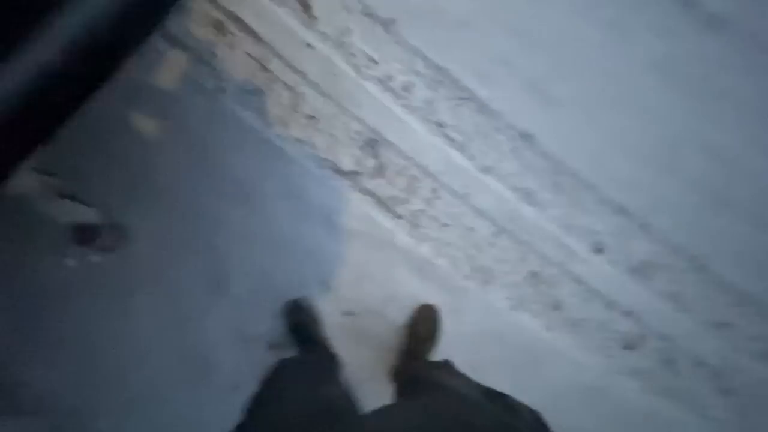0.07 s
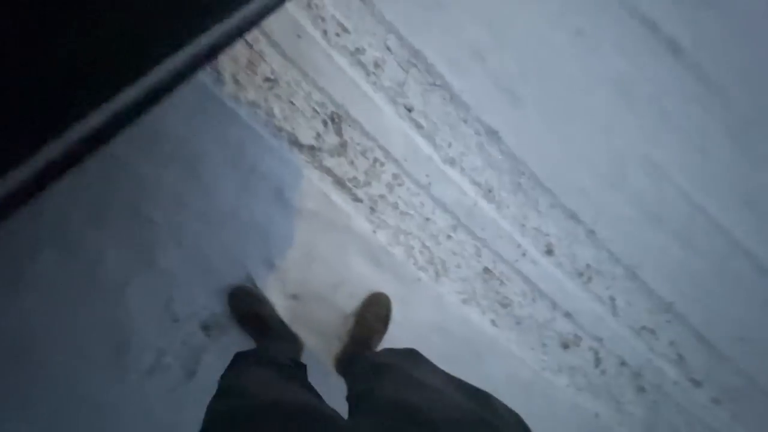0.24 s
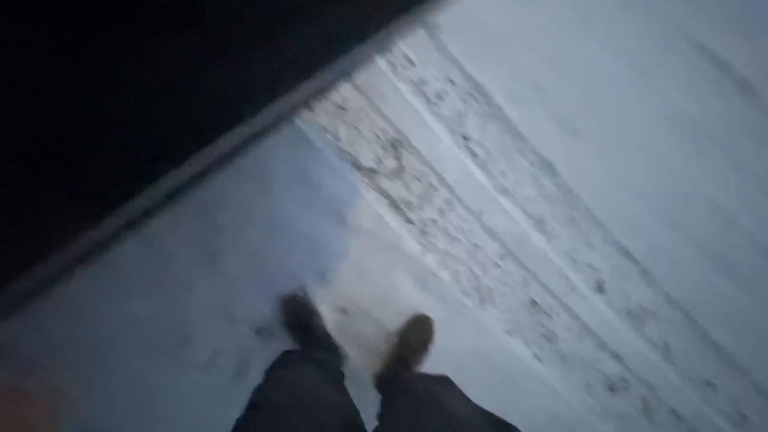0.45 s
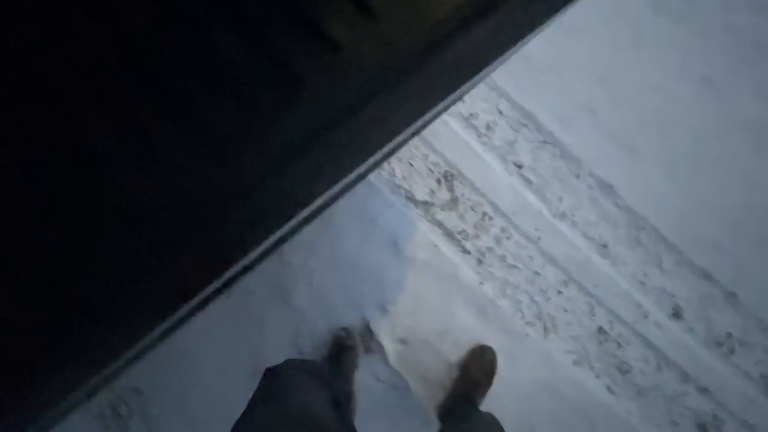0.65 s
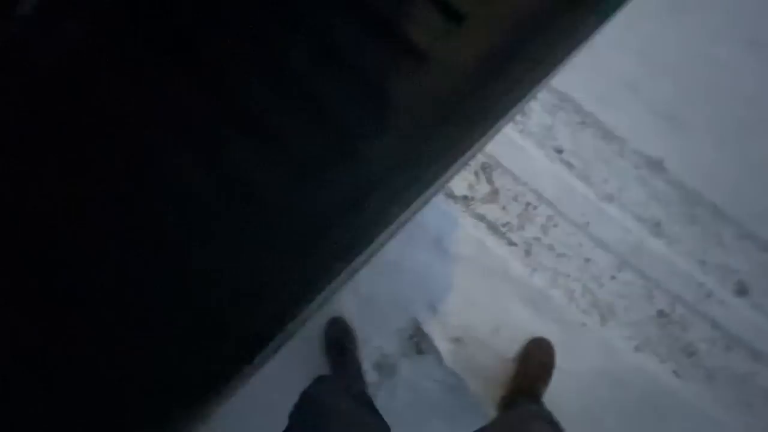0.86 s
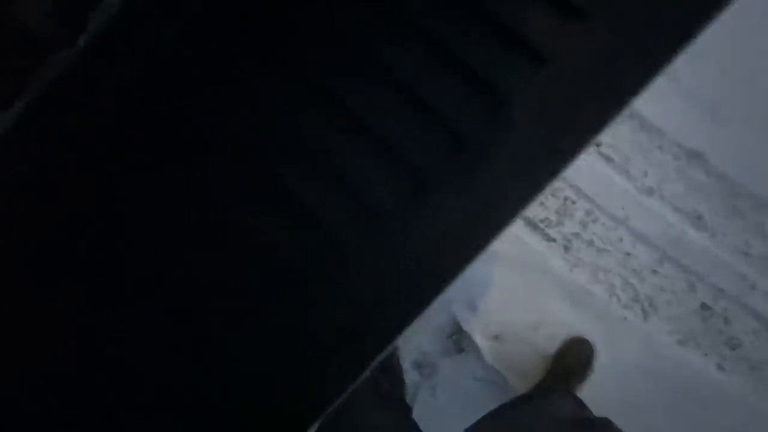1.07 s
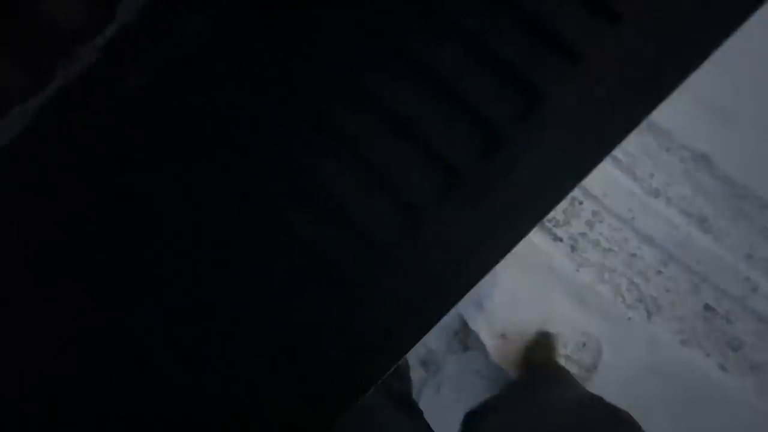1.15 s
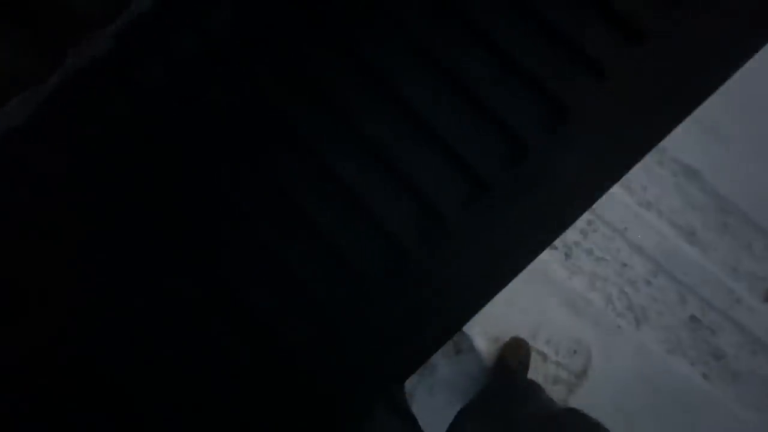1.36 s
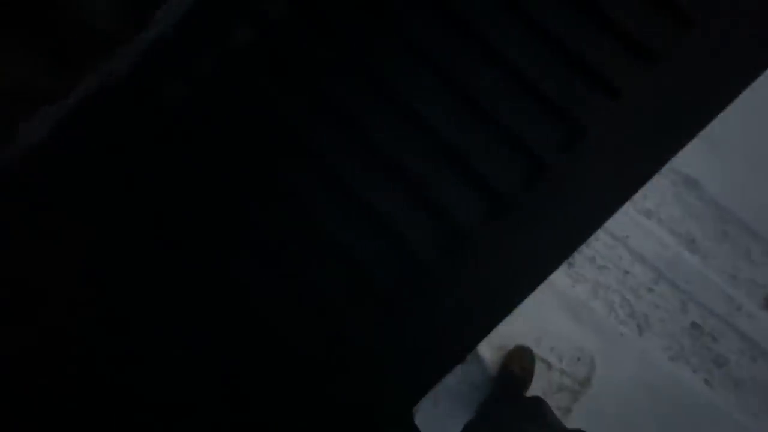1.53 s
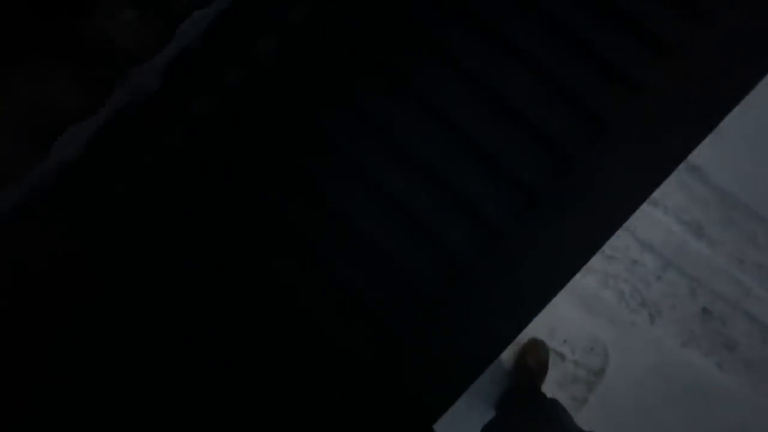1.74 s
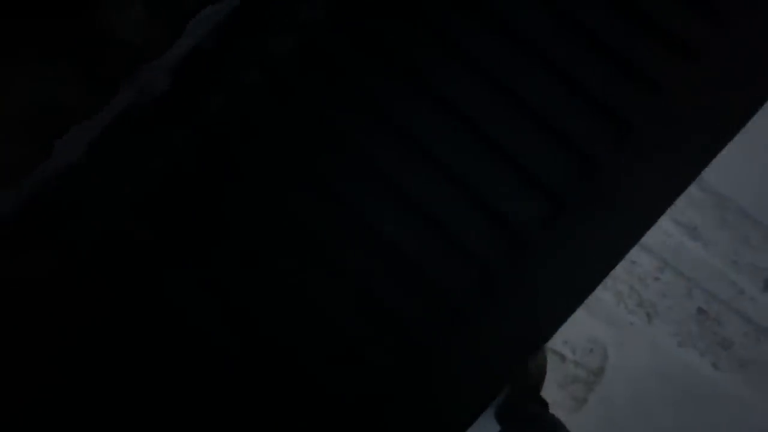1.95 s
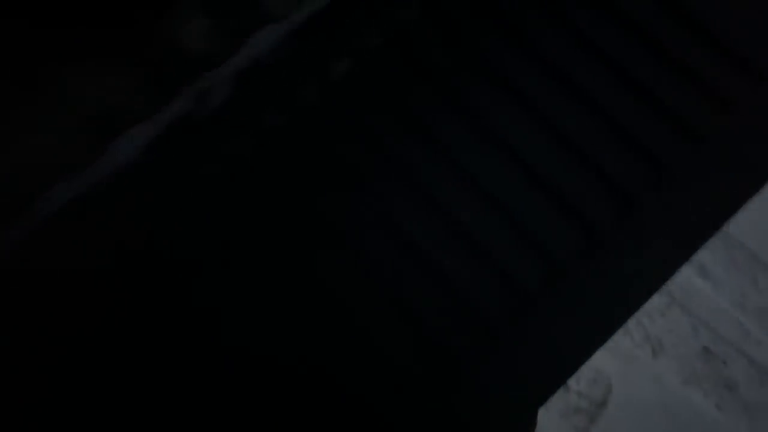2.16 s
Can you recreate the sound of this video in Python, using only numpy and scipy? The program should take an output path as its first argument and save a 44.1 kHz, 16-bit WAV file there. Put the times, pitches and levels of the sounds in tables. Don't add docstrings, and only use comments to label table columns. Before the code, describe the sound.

Close and slightly left, a metal tailgate bangs down, its panel shuddering and ringing. Quieter snow crunches follow on the right, then a near-quiet pause and several dull metal knocks, over low outdoor rumble and nylon rustle.

```python
import sys
import numpy as np
from scipy import signal
from scipy.fft import rfft, irfft, next_fast_len
from scipy.io import wavfile
from scipy.ndimage import map_coordinates

SR = 44100
rng = np.random.default_rng(int(sys.argv[2]) if len(sys.argv) > 2 else 0)


def linear_from_db(decibels):
    return 10 ** (np.asarray(decibels, float) / 20)


def unload_audio(sound):
    columns = np.transpose(np.atleast_2d(sound))
    steps = np.round(np.clip(columns, -1, 1) * 32767)
    wavfile.write(sys.argv[1], SR, steps.astype(np.int16))


N = 97020

# time_s, level_db
SHUDDER = [(0, -28.5), (.07, -34), (.2, -43), (.222, -38), (.228, -12), (.27, -13.5), (.36, -27.5),
           (.5, -33), (.55, -41), (.63, -43.5), (.68, -47.5), (1.79, -58), (1.83, -51), (2.04, -45.5),
           (2.09, -34.5), (2.2, -42)]
# centre_hz, width_hz, level_db
PANEL_MODES = [(59, 30, -11.5), (98, 34.5, -4.5), (164.4, 31.6, -4), (235, 42.3, -8), (357, 112, -11.5),
               (465, 65, -12), (620, 161, -14), (808, 400, -17), (1081, 183, -14), (1228, 232, -18.5),
               (1840, 1200, -33.5)]
# start_s, level_db, pitch_hz, t60_s
KNOCKS = [(0.227, -12, 59, 0.65), (.229, -20, 140.8, 0.66), (.44, -29, 61, 0.47), (.84, -36.5, 65.9, 1.3),
          (0.454, -24.5, 235, 0.26), (.599, -23.5, 232.9, 0.17), (0.724, -19.5, 239, 0.035),
          (0.85, -31.5, 192.4, 0.067), (1.805, -14.5, 129.3, 0.08), (1.813, -28.5, 556.5, 0.1),
          (1.82, -34.5, 328.4, 0.13), (1.908, -24.5, 751.4, 0.054), (1.956, -17.5, 687, 0.041),
          (1.957, -26, 373, 0.04), (1.974, -29.5, 694, 0.033), (2.063, -27, 169.2, 0.059),
          (2.079, -19.5, 167.5, 0.09), (2.08, -22, 702, 0.081), (2.112, -23, 620, 0.028),
          (2.167, -27, 593.5, 0.17), (2.178, -21.5, 620, 0.036), (2.192, -23.5, 308, 0.054)]
# start_s, level_db, hold_s, t60_s
RATTLES = [(0.0345, -31, 0.0073, 0.092), (0.109, -48, 0.0055, 0.36), (0.199, -44.5, 0.019, 0.062),
           (0.219, -30, 0.012, 0.2), (0.243, -20.5, 0.015, 0.093), (0.284, -37.5, 0.022, 0.17),
           (0.353, -44, 0.0026, 0.25), (0.404, -45, .006, 0.14), (0.414, -40.5, .003, 0.18),
           (0.42, -30.5, 0.0041, 0.057), (0.454, -52, 0.0055, 0.12), (0.477, -56.5, 0.0038, 0.072),
           (0.553, -48, 0.0044, 0.082), (0.726, -52.5, .004, .06), (1.798, -47, 0.0066, 0.084),
           (1.811, -42, 0.013, 0.26), (1.904, -44.5, 0.015, 0.21), (1.954, -44.5, 0.0052, 0.17),
           (2.004, -55, 0.12, 0.13), (2.072, -36, 0.0085, 0.12), (2.104, -45, 0.0087, 0.097),
           (2.163, -45, 0.003, 0.34)]
# centre_hz, width_hz, level_db
LATCH_MODES = [(1154, 250, 4.5), (1690, 520, -0.5), (2015, 307, 0), (2650, 364, -2), (3200, 420, -3.5),
               (3760, 242, -5), (4300, 210, -12.5), (4960, 550, -11), (6140, 2100, -16.5)]
# start_s, level_db, pitch_hz, t60_s
PINGS = [(0.0327, -26, 1216, .03), (0.0316, -29.5, 3050, 0.028), (.032, -36, 2145, 0.028),
         (.008, -25.5, 328, 0.069), (0.025, -30, 199, 0.062), (0.04, -21, 305, 0.078),
         (0.062, -23, 196, 0.092), (.109, -44.5, 2310, 0.077), (.223, -17, 484, 0.056),
         (.245, -18.5, 2280, 0.051), (0.246, -14.5, 1059, 0.092), (.245, -12.5, 742, 0.067),
         (.259, -19.5, 1815, 0.059), (.264, -12.5, 513, 0.048), (0.42, -29.5, 1346, 0.065),
         (0.4226, -27, 2417, 0.028), (.422, -36.5, 4020, 0.028), (0.434, -31.5, 1261, 0.12),
         (.553, -23, 970, 0.014), (.606, -36.5, 634, 0.049), (.611, -28, 268, 0.093),
         (.729, -39, 620, 0.047), (1.803, -42, 2600, 0.032), (1.803, -36.5, 1580, 0.046),
         (1.813, -38, 2600, 0.053), (1.813, -37.5, 2060, 0.043), (1.813, -41, 3500, 0.056),
         (1.803, -30.5, 617, 0.037), (1.835, -34, 936, 0.041), (1.848, -31.5, 121.5, 0.13),
         (1.910, -36, 2450, 0.025), (1.913, -39.5, 1690, 0.035), (1.908, -48, 4330, 0.056),
         (1.92, -42, 2620, 0.034), (1.959, -29.5, 1167, 0.055), (1.958, -42, 2685, .05),
         (1.957, -44, 3760, 0.036), (1.957, -43.5, 5290, .03), (2.044, -32.5, 556, 0.047),
         (2.0755, -31, 2130, 0.025), (2.077, -30, 3840, 0.028), (2.079, -41, 4300, 0.033),
         (2.077, -44.5, 4900, 0.039), (2.077, -35, 1610, 0.039), (2.083, -35, 2600, 0.057),
         (2.082, -21, 352, 0.073), (2.111, -36, 1194, 0.047), (2.111, -41, 2750, 0.032),
         (2.188, -47, 2510, .06)]
# start_s, level_db, hold_s, crystals_db
STEPS = [
    (0.79, -39, 0.044, -11),
    (0.825, -42.5, 0.011, -18),
    (0.863, -62, 0.2, 8),
    (1.054, -51.5, 0.054, 6),
    (1.117, -57.5, 0.031, 8),
    (1.149, -50, 0.036, 4),
    (1.191, -47.5, 0.032, 3),
    (1.239, -64, 0.021, -1),
    (1.288, -75.5, 0.046, 14),
]
# freq_hz, level_db_per_hz
LUMP_SPECTRUM = [(250, -11), (420, 13), (600, 7.5), (900, 5.5), (1300, -2), (2000, -35)]
# freq_hz, level_db_per_hz
CRYSTAL_SPECTRUM = [(700, 3.5), (1200, -0.5), (2500, -1.5), (3200, -4.5), (5000, -16.5), (8000, -25),
                    (15500, -13.5)]
# start_s, level_db, pitch_hz
SNAPS = [
    (.79, -30, 600),
    (.808, -25, 520),
    (.836, -29, 850),
    (1.1955, -25, 900),
    (1.209, -32, 1800),
    (1.221, -30, 1200),
]
# start_s, level_db, hold_s, t60_s
RUSTLES = [(0, -60, 0.32, 0.094), (.109, -60, 0.0066, 0.018), (.228, -25.5, 0.0023, 0.051),
           (.29, -45, 0.013, 0.23), (.356, -48, 0.0058, 0.22), (.42, -49, 0.011, 0.62),
           (.533, -52, 0.0082, 0.057), (.556, -47, 0.0045, 0.15), (.607, -45.5, 0.0024, 0.075),
           (.72, -53, 0.0099, 0.07), (.78, -55.5, 0.04, 0.12), (.64, -66.5, 0.63, 0.19),
           (1.044, -53.5, 0.0021, 0.029), (1.06, -58, 0.051, 0.21), (1.15, -60, 0.067, 0.1075),
           (1.245, -63.5, 0.057, 0.11), (1.295, -60, 0.022, 0.11), (1.79, -59.5, 0.011, .05),
           (1.8, -57, 0.042, 0.42), (1.95, -64, 0.14, 0.11), (2.07, -62, 0.175, 0.14)]
# start_s, peak_db
CREASES = [
    (1.4297, -68),
    (1.4735, -68),
    (1.495, -62),
    (1.5736, -73.5),
]
# freq_hz, level_db_per_hz
NYLON_SPECTRUM = [(2350, -11.5), (4000, -11), (8430, -9), (10100, -8), (11300, -10), (12800, -9),
                  (15600, -23)]
# freq_hz, level_db_per_hz
AIR_SPECTRUM = [(25, -25.5), (40, -12), (60, 1.5), (210, -29.5), (1310, -26), (2600, -45.5), (5000, -60),
                (13000, -51)]
# freq_hz, correlation
AIR_LIKENESS = [(60, 0.91), (240, 0.55), (950, -0.37), (3770, -0.13), (15000, 0.21)]
# centre_hz, width_hz, depth_0_to_1
HOUSING_NOTCHES = [(5400, 160, 0.2), (7250, 300, 0.8), (10380, 1200, 0.72)]

HUM_HZ, HUM_DB, HUM_T60_S, HUM_START_S = 109.7, -32.5, 4.05, .23
PING_RISE_S, PING_BEAT_SHARE, PING_PARTNER_DB = .0008, .09, -3
STEP_RISE_S, STEP_T60_S = 0.0035, 0.12
AIR_DB = -48
GATE_LEAD_S, GATE_PAN_DB = 0.0004534, 4
BOOT_LEAD_S, BOOT_PAN_DB = -0.00016, -4.5
MONO_HZ, LOW_CUT_HZ, TOP_HZ = 11500, 35, 15750


def unit(x):
    return x / np.sqrt(np.mean(x ** 2) + 1e-20)


def along(points, hz):
    f, v = np.transpose(points)
    return np.interp(np.log(hz + 1), np.log(f + 1), v)


def wobble(rate_hz):
    knots = rng.standard_normal(int(N * rate_hz / SR) + 4)
    return map_coordinates(knots, [np.arange(N) * rate_hz / SR])


def filtered(x, response):
    m = next_fast_len(N + SR // 2)
    return irfft(rfft(x, m) * response(np.fft.rfftfreq(m, 1 / SR)), m)[..., :N]


def colour(x, spectrum):
    closed = [(spectrum[0][0] / 2, -90), *spectrum, (spectrum[-1][0] + 400, -120)]
    return unit(filtered(x, lambda hz: linear_from_db(along(closed, hz))))


def resonances(modes):
    def response(f):
        total = 0
        for k, (centre, width, db) in enumerate(modes):
            total = total + (-1) ** k * linear_from_db(db) * 1j * f * width / (centre ** 2 - f * f + 1j * f * width)
        return total
    return response


def bursts(rows, rise_s):
    t = np.arange(N) / SR
    total = 0
    for start, db, hold, t60 in rows:
        decay = linear_from_db(db - 60 * np.clip(t - start - hold, 0, None) / t60)
        total = total + decay * np.clip((t - start) / rise_s, 0, 1)
    return total


def grit(per_s, spread_db, alike):
    chance, size, sign = rng.random((3, 3, N)).swapaxes(0, 0)
    breaks = (chance < per_s / SR) * linear_from_db(-spread_db * np.log(size + 1 / 200)) * np.sign(sign - .5)
    share = np.clip(alike, 0, 1)
    return np.sqrt(share) * breaks[0] + np.sqrt(1 - share) * breaks[1:]


def placed(pair, lead_s, pan_db):
    side = np.array([[.5], [-.5]])
    return filtered(pair, lambda hz: linear_from_db(pan_db * side) * np.exp(2j * np.pi * hz * lead_s * side))


def tailgate():
    return placed(shudder() + ringing_steel() + rattle(), GATE_LEAD_S, GATE_PAN_DB)


def shudder():
    level_db = np.interp(np.arange(N) / SR, *np.transpose(SHUDDER))
    panel = filtered(grit(3000, 3.43, 0.88), resonances(PANEL_MODES))
    return linear_from_db(level_db + 0.27 * wobble(42.0)) * unit(panel)


def ringing_steel():
    t = np.arange(N) / SR
    since = np.clip(t - HUM_START_S, 0, None)
    level_db = HUM_DB - 60 * since / HUM_T60_S + 4.1 * wobble(20)
    tones = linear_from_db(level_db) * np.sin(2 * np.pi * HUM_HZ * since + 2.1 * wobble(9.21))
    for start, db, hz, t60 in KNOCKS:
        since = np.clip(t - start, 0, None)
        level = linear_from_db(db - 60 * since / t60 + 1.3 * wobble(hz / 3))
        tone = np.sin(2 * np.pi * hz * since + 0.94 * wobble(hz / 4))
        tones = tones + level * tone * (1 - np.exp(-since * hz * 2.8))
    return tones


def rattle():
    chatter = bursts(RATTLES, .0007) * linear_from_db(3 * wobble(150)) * unit(grit(4000, 3, .5))
    clicks = [round(start * SR) for start, *_ in RATTLES]
    chatter[:, clicks] += linear_from_db([db + 15 for _, db, *_ in RATTLES])
    return linear_from_db(8) * filtered(chatter, resonances(LATCH_MODES))


def pings():
    out = np.zeros((2, N + SR))
    t = np.arange(SR // 6) / SR
    for start, db, hz, t60 in PINGS:
        detune, left_rad, right_rad = rng.uniform(-0.9, 1, 3)
        partner_hz = hz * (1 + PING_BEAT_SHARE * detune)
        partner = np.sin(2 * np.pi * (partner_hz * t + np.array([[left_rad], [right_rad]])))
        ring = np.sin(2 * np.pi * hz * t) + linear_from_db(PING_PARTNER_DB) * partner
        first = round(start * SR)
        out[:, first:first + len(t)] += linear_from_db(db - 60 * t / t60) * (1 - np.exp(-t / PING_RISE_S)) * ring
    return placed(out[:, :N], GATE_LEAD_S, GATE_PAN_DB)


def boots():
    lump_rows = [(start, db, hold, STEP_T60_S) for start, db, hold, _ in STEPS]
    fine_rows = [(start, db + fine_db - 4, hold, STEP_T60_S) for start, db, hold, fine_db in STEPS]
    lumps = bursts(lump_rows, STEP_RISE_S) * colour(grit(1500, 3.4, 0.88), LUMP_SPECTRUM)
    crystals = bursts(fine_rows, STEP_RISE_S) * colour(grit(2500, 3.5, .7), CRYSTAL_SPECTRUM)
    crunch = linear_from_db(1.3 * wobble(70.5)) * (lumps + crystals)
    return placed(crunch + crust(), BOOT_LEAD_S, BOOT_PAN_DB)


def crust():
    t = np.arange(N) / SR
    snaps = 0
    for start, db, hz in SNAPS:
        since = np.clip(t - start, 0, None)
        snaps = snaps + linear_from_db(db - hz ** 1.3 * since) * np.sin(2 * np.pi * hz * since)
    cracks = bursts([(start, db - 5, 0, .012) for start, db, hz in SNAPS if hz > 800], .0002)
    return snaps + cracks * colour(rng.standard_normal(N), CRYSTAL_SPECTRUM)


def jacket():
    rustle = bursts(RUSTLES, 0.0022) * linear_from_db(1.75 * wobble(90))
    ticks = bursts([(start, db - 6, .001, .015) for start, db in CREASES], .0005)
    fibres = colour(grit(20000, 1.8, .7), NYLON_SPECTRUM)
    return placed((rustle + ticks) * fibres, GATE_LEAD_S, 2.3)


def air():
    def mid_side(hz):
        angle = np.arccos(np.clip(along(AIR_LIKENESS, hz), -1, 1)) / 2
        return linear_from_db(along(AIR_SPECTRUM, hz)) * np.array([np.cos(angle), np.sin(angle)])
    mid, side = filtered(rng.standard_normal((2, N)), mid_side)
    return linear_from_db(AIR_DB + 1.2 * wobble(15)) * unit(np.array([mid + side, mid - side]))


def scene():
    return tailgate() + pings() + boots() + jacket() + air()


def low_pass(x):
    return signal.sosfilt(signal.butter(12, 15750, fs=SR, output="sos"), x)


def record(dry):
    def camera(f):
        response = (1j * f / (LOW_CUT_HZ + 1j * f)) ** 2 * (f < TOP_HZ)
        for centre, width, depth in HOUSING_NOTCHES:
            response = response * (1 - np.clip(depth, 0, .95) / (1 + (2 * (f - centre) / width) ** 2))
        return response
    x = filtered(dry, camera)
    treble_side = filtered((x[0] - x[1]) / 2, lambda f: 0.75 * (f > MONO_HZ))
    x = x - treble_side * np.array([[1], [-1]])
    mix = x / (1 + np.abs(x / .85) ** 6) ** (1 / 6)
    return low_pass(mix)


dry = scene()
out = record(dry)
unload_audio(out)
```